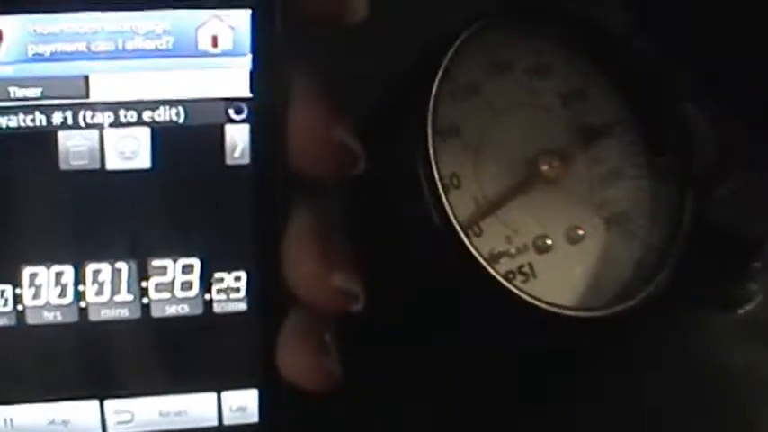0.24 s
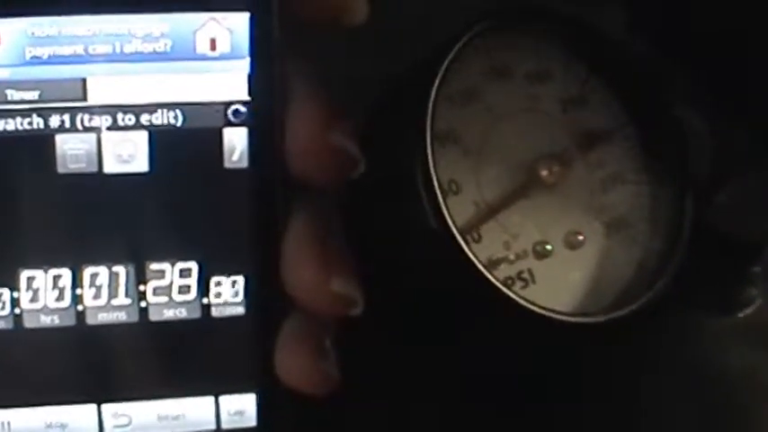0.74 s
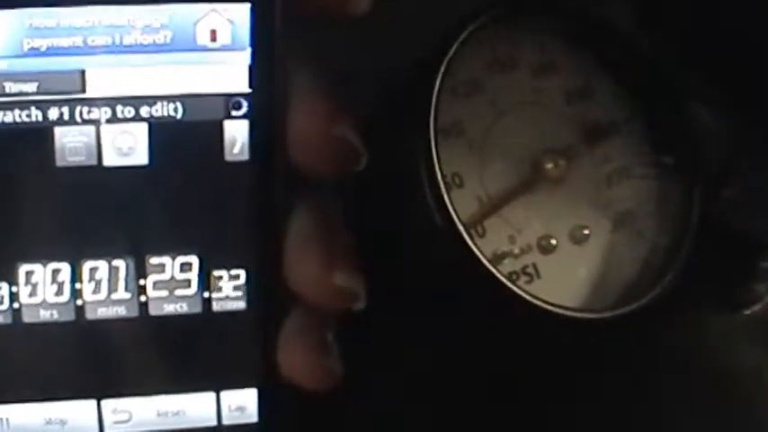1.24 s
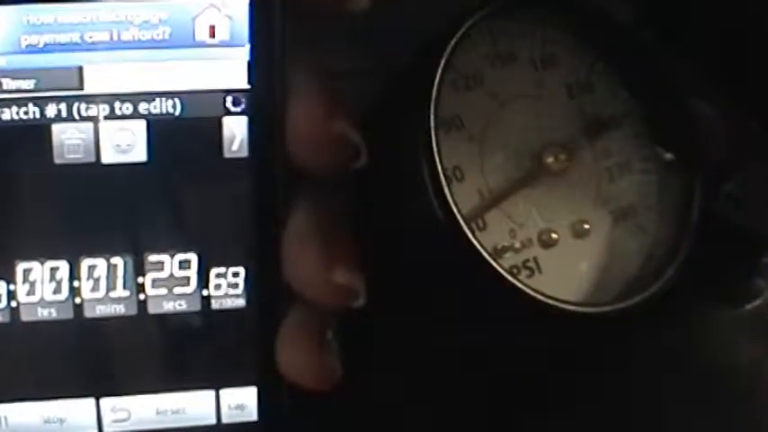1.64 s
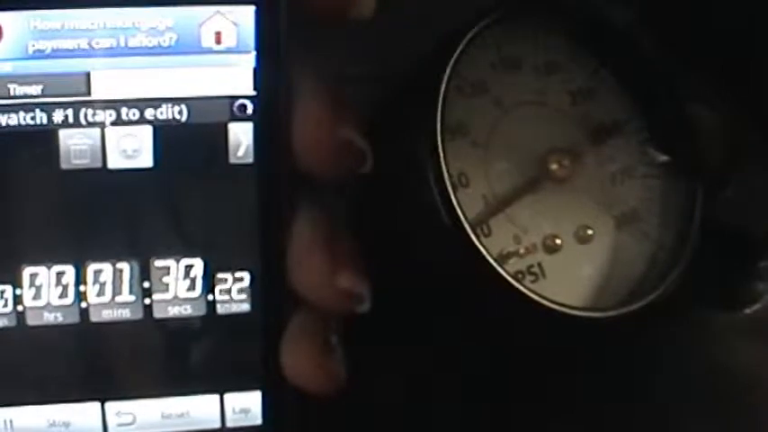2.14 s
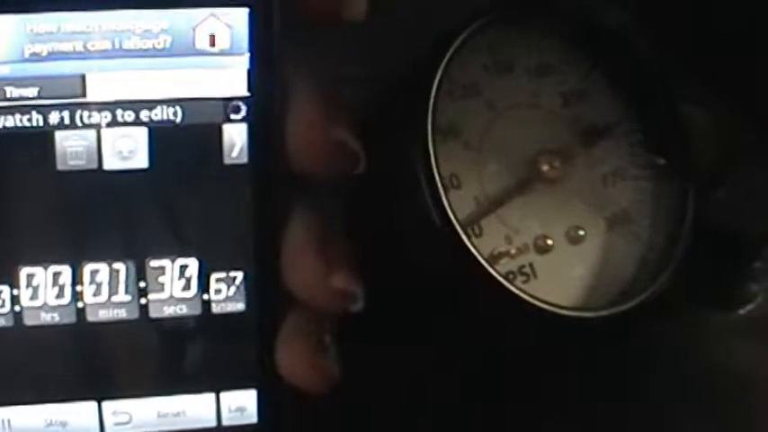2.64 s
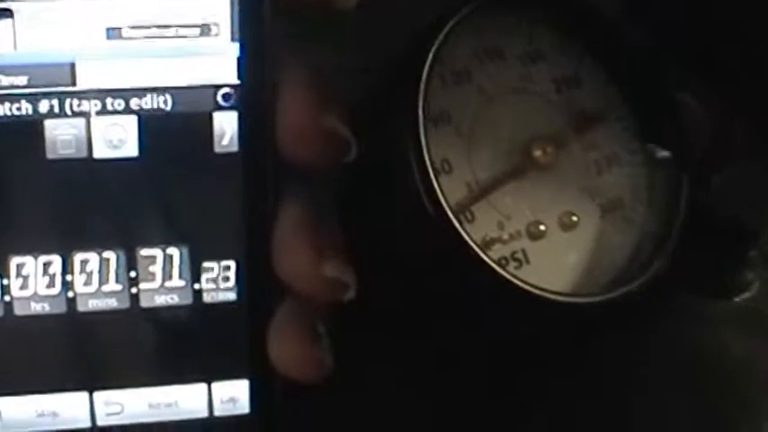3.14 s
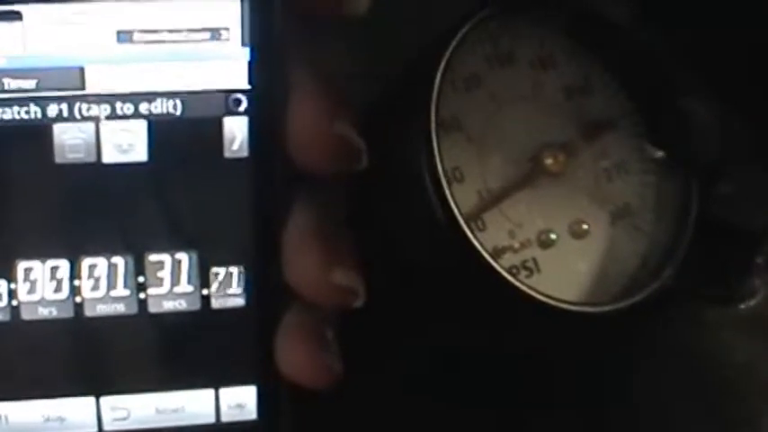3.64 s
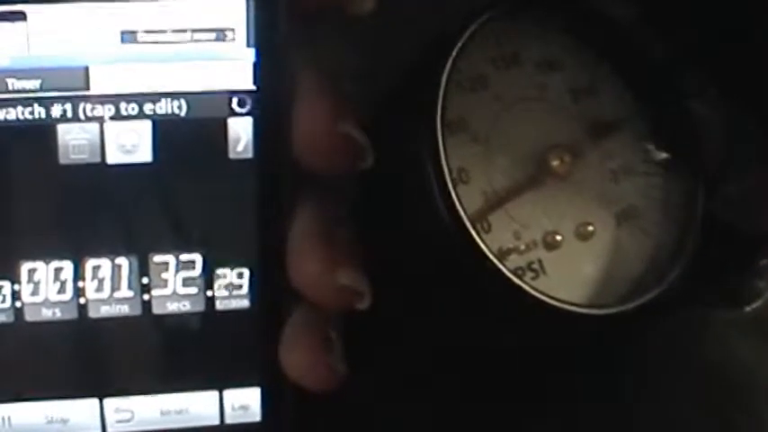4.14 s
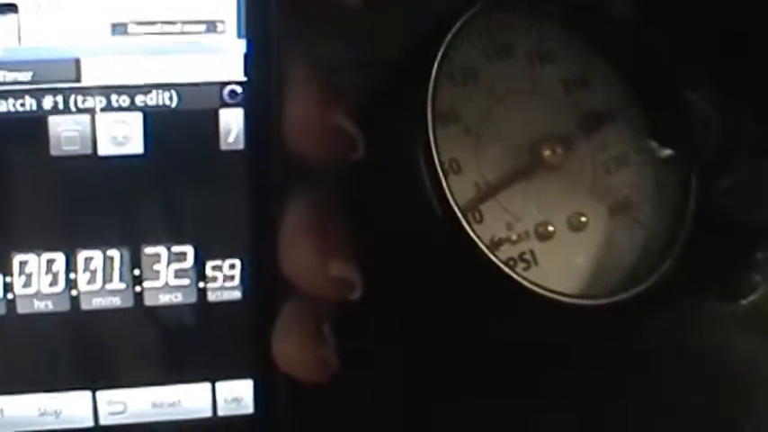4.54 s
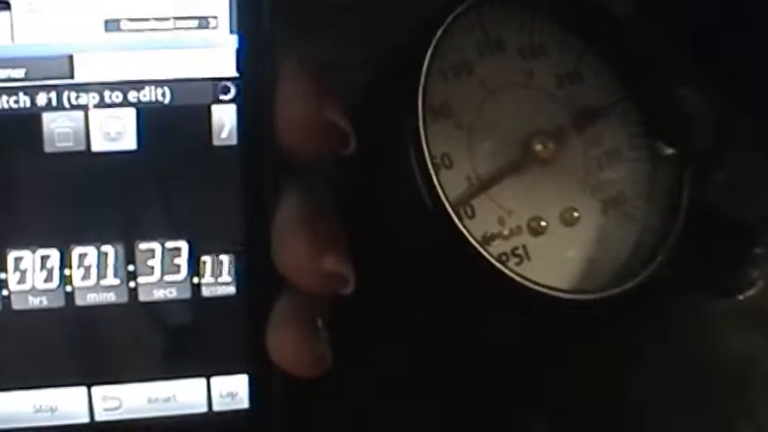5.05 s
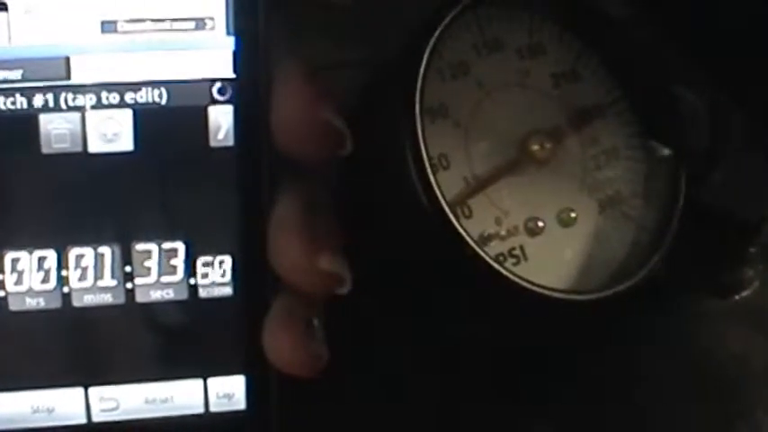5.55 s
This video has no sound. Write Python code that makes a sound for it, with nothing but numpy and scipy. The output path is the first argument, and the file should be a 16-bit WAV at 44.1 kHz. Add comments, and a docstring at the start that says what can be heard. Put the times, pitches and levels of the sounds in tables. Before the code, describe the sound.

A belt-driven piston air compressor pumps quickly and evenly from start to finish. A low hum throbs about thirty-four times a second beneath dense metal knocks, ringing clatter and bright, hissing valve chatter. The hum grows somewhat fuller after about a second and a half. The microphone is close in a small workshop, with loud, slightly rough stereo sound and little deep bass.

```python
"""A steady, fast pumping: a low hum that throbs and thumps, metal knocking, and bright chatter and hiss.
It is a belt-driven twin-piston air compressor in a small workshop, close to the microphone.
The intake is made of tones locked to the crank plus a rung pipe; knocks ring the metal parts;
bouncing reed valves let out bursts of noise; the motor buzzes at twice the mains rate.
Filtered noise stands for fan, belt and room, and blurred echoes make the sound stereo."""
import sys
import numpy as np
from scipy import signal
from scipy.fft import rfft, irfft, next_fast_len
from scipy.io import wavfile
from scipy.ndimage import uniform_filter1d

SR = 44100
rng = np.random.default_rng(int(sys.argv[2]) if len(sys.argv) > 2 else 0)


def put_to_file(sound):
    """Save the sound as 16-bit audio at rate SR, in the file named by the first command-line argument."""
    columns = np.atleast_2d(sound).T  # one column per channel
    safe = np.clip(columns, -1, 1)
    whole_steps = np.round(safe * 32767)
    wavfile.write(sys.argv[1], SR, whole_steps.astype(np.int16))


N = 255780
T = np.arange(N) / SR  # time of each sample, s

START_TURN, DEAD_CENTRE = .006, .005  # crank positions, turns
MAINS_BUZZ_HZ = 119.95
TOP_HZ = 15560  # highest pitch the microphone passes
SETTLES_S, SETTLING_S = 1.66, 0.25  # middle and time constant of the one change in the machine's tone

# Crank speed. Each row: time in seconds, speed in turns per second.
CRANK_SPEED = [(0, 16.9163), (1.5, 16.915), (2.5, 16.913), (3, 16.9145), (3.6, 16.9125), (5.8, 16.9115)]
# Further intake tones. Each row: multiple of the crank rate, level in dB, sign (1 or -1) at dead centre.
INTAKE_TONES = [(20, -17, 1), (19, -26.5, -1), (22, -29.5, 1), (17, -45.5, -1)]
# Knocks in one turn, listed by the part that takes them. Each row: crank angle in turns, strength in dB.
KNOCKS_PER_TURN = { "intake": [(0.0154, -8.8), (0.3919, -2.1), (0.8909, 0.0)], "crankcase": [(.0066, -6),
                   (.3036, -15.5), (.4736, -9), (.5068, -1.5), (.6272, -7.5), (.897, -1.2), (.9469, -4.5)],
                   "head": [(0.2292, -9.5), (0.515, -2), (0.7182, -13.5), (0.9805, 1)],
                   "tank": [(0.4804, -7.5), (0.5882, -0.5), (0.7082, -5), (0.8383, -7.5)],
                   "fins": [(.052, -4), (.105, -8), (.28, -4), (.455, -7), (.498, 1), (.61, -2), (.675, -4),
                   (.80, -11), (.985, 0)], "plate": [(.035, -1), (.13, -7), (.195, -9), (.275, -7),
                   (.475, -2), (.54, -1), (.68, -1), (.93, -3), (.98, -1)], "guard": [(.05, -10), (.13, -7),
                   (.295, -4), (.54, -2), (.66, -15), (.82, -4)], }
# Natural tones of the intake pipe and the metal parts, in relative dB.
# Each row: pitch in Hz, level in dB, time to fade by 60 dB in seconds.
PIPE_MODES = [(73.7, -13.6, 0.25), (130, -1, 0.059), (172, -7.5, 0.13), (254.6, -3.6, 0.34)]
CRANKCASE_MODES = [(401.3, -9, 0.16), (506, -11.5, 0.14), (570.7, -10, 0.097), (647.5, -0.76, 0.098),
                   (661, 3, 0.034), (768, -3, 0.045), (863, -5, 0.084), (950.6, -14, 0.27)]
HEAD_MODES = [(1056.8, 1.5, 0.21), (1105.0, -2, 0.082)]
TANK_MODES = [(1169, -5.5, 0.073), (1231, -7, 0.28), (1279.5, -7, 0.22), (1329, -1, 0.071)]
FIN_MODES = [(1415, -1, 0.02), (1569, 0, 0.036), (1723, 0, 0.036), (1792, 1, 0.031), (1938, -3.5, 0.045),
             (2184, -2, 0.034), (2282, -5, 0.024)]
PLATE_MODES = [(2477, -7, 0.1), (2627, 0, 0.081), (2702, 6.5, 0.027), (2855, -1, 0.055), (3070, -7, 0.037)]
GUARD_MODES = [(3260, 1, 0.025), (3380, 1, 0.048), (3520, -6, 0.076), (3690, -11, 0.038)]
REED_MODES = [(5600, -9, .01), (6275, -3, .03), (6900, -6, .012), (7805, -1, .04), (8105, -5, .04),
              (8430, 0, .04), (8700, -2, .03), (9006, -2, .04), (9140, -2, .03), (9340, -2, .03),
              (9457, 0, .06), (9700, -3, .02), (10118, -1, .03), (10750, -4, .03), (11060, -4, .03),
              (11500, -6, .03), (12400, -5, .01), (12880, -4, .04), (13500, -3, .012), (14800, -5, .02)]
WHINE_MODE = [(2948, 0, .5)]
# Reed openings. Each row: crank angle in turns, strength in dB, gap between bounces in turns,
# loss per bounce in dB, timing spread in seconds.
REED_BOUNCES = [(0.097, -6, .0265, 0.8, 0.000046), (.597, -8.5, 0.034, 0.5, 0.00024)]
# Tone colour of the background air noise. Each row: pitch in Hz, relative level in dB.
AIR_COLOUR = [(18, -74), (30, -19), (114, -11.5), (208, -21), (332, 1), (443, -8), (500, -5), (700, -9),
              (945, -8.5), (1080, -41), (1400, -24.5), (2690, -4.5), (4310, -30), (9430, -40.5),
              (15500, -29)]
# Tone colours of the air at the reeds and of their ring. Each row: pitch in Hz, relative level in dB.
CRACK_COLOUR = [(3500, -73), (5000, -11), (6500, -8), (8000, 1), (9500, 9.5), (11000, -1),
                (13000, -2), (15000, -12)]
HISS_COLOUR = [(3500, -74), (5000, -2.0), (6500, 4.5), (9500, 1.0), (12000, 1.5), (15000, 0.5)]
REED_RING_COLOUR = [(3500, -22), (6000, -5)]
# Difference between the two microphone ports. Each row: pitch in Hz, side level relative to mid in dB.
PORT_DIFFERENCE = [(30, -3), (70, -19.5), (330, -30), (450, -19.5), (640, -2), (830, -10.5), (1080, -23.5),
                   (1500, -8), (2700, -18.5), (4500, 3.5), (6500, -1), (9400, -11), (13000, -4.5)]
# Levels around the one change, listed by voice: level before in dB, level after in dB.
VOICE_LEVELS = {"lower tone": (-23, -17), "thump": (-33, -34), "crankcase": (-27.5, -29),
                "tank": (-29, -29.5), "fins": (-28, -29.5), "plate": (-24.5, -25), "guard": (-38.5, -40),
                "reeds": (-33, -33.5), "air": (-25.5, -26.5)}
# Level of the head's ring. Each row: time in seconds, level in dB.
HEAD_LEVEL = [(0, -19), (.6, -21), (1.4, -21), (2.1, -22), (2.8, -21.5), (3.3, -20), (3.7, -21), (4.2, -20),
              (5.8, -20.5)]


def undb(db):
    """Turn decibels into a plain gain."""
    return 10 ** (np.asarray(db) / 20)


def level(x, db):
    """Scale a sound so that its average (rms) level is db."""
    return x * undb(db) / np.sqrt(np.mean(x ** 2))


def curve(table, column):
    """Join the points of one table column by straight lines, one value per sample."""
    points = np.array(table)
    return np.interp(T, points[:, 0], points[:, column])


def colour(x, table):
    """Change the tone by drawing a loudness curve over pitch."""
    hz, db = np.transpose(table)
    size = next_fast_len(N)
    pitch = np.maximum(np.arange(size // 2 + 1) * SR / size, 1)
    gain = undb(np.interp(np.log(pitch), np.log(hz), db))
    return irfft(rfft(x, size) * gain, size)[:N]


def decay(pulses, fade_s):
    """Give every pulse a tail that dies away smoothly."""
    return signal.lfilter([1], [1, -np.exp(-1 / (fade_s * SR))], pulses)


def ring(x, modes):
    """Let x excite fading tones; neighbouring tones start in opposite directions."""
    out = 0
    for k, (hz, db, t60) in enumerate(modes):
        shrink = np.exp(-np.log(1000) / (t60 * SR))  # per sample
        step = 2 * np.pi * hz / SR  # radians per sample
        tone = signal.lfilter([0, np.sin(step)], [1, -2 * shrink * np.cos(step), shrink * shrink], x)
        out = out + (-1) ** (k + 1) * undb(db) * tone
    return out


def every_turn(turn, angles, db, slip_s, scatter_db):
    """Place a pulse at each crank angle of each turn, slightly off in time and size."""
    at = (np.arange(-1, int(turn[-1]) + 1)[:, None] + np.asarray(angles)).ravel()
    chance = rng.standard_normal((len(at), 2))
    on_time = np.interp(at, turn, np.arange(N), -N, 2 * N)
    i = (on_time + slip_s * SR * chance[:, 0]).astype(int)
    size = undb(np.resize(db, len(at)) + scatter_db * chance[:, 1])
    inside = (i >= 0) & (i < N)
    return np.bincount(i[inside], size[inside], N)


def knocks(turn, part, slip_s, scatter_db):
    """Collect the blows that one part takes, turn after turn."""
    angles, db = np.transpose(KNOCKS_PER_TURN[part])
    return every_turn(turn, angles, db, slip_s, scatter_db)


def voice(name):
    """Gain of a voice, gliding from its level before the change to its level after."""
    before_db, after_db = VOICE_LEVELS[name]
    progress = (1 + np.tanh((T - SETTLES_S) / SETTLING_S)) / 2
    return undb(before_db + (after_db - before_db) * progress)


def air():
    """Steady coloured noise for the fan, the belt and the workshop's wash of echoes."""
    return voice("air") * level(colour(rng.standard_normal(N), AIR_COLOUR), 0)


def motor():
    """Magnetic pull buzzes at twice the mains rate; noise through a narrow ring gives a wavering whine."""
    phase = 2 * np.pi * MAINS_BUZZ_HZ * T
    buzz = undb(-33.0) * np.cos(phase)
    fourth_harmonic = undb(-39) * np.cos(4 * phase)
    whine = level(ring(rng.standard_normal(N), WHINE_MODE), -33.5)
    return buzz + fourth_harmonic + whine


def reeds(turn):
    """Each reed lifts softly, then bounces on its seat, spitting air through the head."""
    bounce = np.arange(13)
    taps = 0
    for angle, db, gap, loss_db, slip_s in REED_BOUNCES:
        bounce_db = db - loss_db * bounce - 3.6 * (bounce == 0)  # the first lift is softer
        taps = taps + every_turn(turn, angle + gap * bounce, bounce_db, slip_s, scatter_db=1.5)
    spit = decay(taps, fade_s=0.00014)
    noise = rng.standard_normal((3, N))
    crack = colour(level(spit * noise[0], 0), CRACK_COLOUR)
    # the leak past the rings follows the bounces only loosely
    leak = level((uniform_filter1d(spit, size=120) + 0.087) * noise[1], 0)
    hiss = colour(leak, HISS_COLOUR)
    ringing = colour(ring((level(spit, 0) + 0.63) * noise[2], REED_MODES), REED_RING_COLOUR)
    return voice("reeds") * (level(crack, -5.5) + level(hiss, 0.63) + level(ringing, -2.04))


def struck(pulses, modes, rattle_db, rattle_s, rub_db, touching):
    """Clean blows ring a part; rattle and rubbing ring it too, but contact shortens that ring to a share."""
    noise = rng.standard_normal((2, N))
    rattle = level(decay(pulses, rattle_s) * noise[0], 0)
    rubbing = undb(rub_db) * noise[1]
    damped = np.array(modes) * [1, 1, touching]
    rough = ring(rattle + rubbing, damped)
    clean = level(ring(pulses, modes), 0)
    return level(clean + level(rough, rattle_db), 0)


def metalwork(turn):
    """Valves and bearings knock the metal; each part rings with its own tones to its own knocks."""
    def part(name, modes, scatter_db, **roughness):
        return struck(knocks(turn, name, slip_s=.00003, scatter_db=scatter_db), modes, **roughness)
    case = part("crankcase", CRANKCASE_MODES, scatter_db=1.8,
                rattle_db=-18.0, rattle_s=0.015, rub_db=-10, touching=0.83)
    head = part("head", HEAD_MODES, scatter_db=0.2,
                rattle_db=-6.5, rattle_s=0.011, rub_db=-6, touching=0.57)
    tank = part("tank", TANK_MODES, scatter_db=0.5,
                rattle_db=-4.0, rattle_s=0.0036, rub_db=3, touching=0.81)
    fins = part("fins", FIN_MODES, scatter_db=1.0,
                rattle_db=-0.8, rattle_s=0.0028, rub_db=1.5, touching=0.87)
    plate = part("plate", PLATE_MODES, scatter_db=1.0,
                 rattle_db=5.5, rattle_s=0.002, rub_db=-10, touching=0.89)
    guard = part("guard", GUARD_MODES, scatter_db=1.5,
                 rattle_db=1, rattle_s=0.0039, rub_db=10.0, touching=0.51)
    # minus: the head's face swings away from the microphone first
    return (voice("crankcase") * case - undb(curve(HEAD_LEVEL, column=1)) * head + voice("tank") * tank
            + voice("fins") * fins + voice("plate") * plate + voice("guard") * guard)


def intake(turn):
    """Tones at 18 and 20 times the crank rate throb twice a turn; suction strokes thump in the pipe."""
    angle = 2 * np.pi * (turn - DEAD_CENTRE)
    tones = -voice("lower tone") * np.cos(18 * angle)
    for multiple, db, sign in INTAKE_TONES:
        tones = tones + sign * undb(db) * np.cos(multiple * angle)
    strokes = knocks(turn, "intake", slip_s=.00005, scatter_db=.4)
    return tones + voice("thump") * level(ring(strokes, PIPE_MODES), 0)


def scene():
    """The machine sounds from the front; restless echoes of nearby surfaces tell the two ports apart."""
    turn = START_TURN + np.cumsum(curve(CRANK_SPEED, column=1)) / SR
    mid = air() + motor() + reeds(turn) + metalwork(turn) + intake(turn)
    hz, _, frames = signal.stft(mid, SR, nperseg=1024)
    # the phase of each pitch band wanders at random, so the echo stays unlike the direct sound
    steps = 0.802 * rng.standard_normal(frames.shape)  # radians per frame
    drift = np.cumsum(steps, axis=1) + 2 * np.pi * rng.random((len(hz), 1))
    echo = signal.istft(frames * np.exp(1j * drift), SR, nperseg=1024)[1][:N]
    side = colour(echo, PORT_DIFFERENCE)
    return np.array([mid + side, mid - side])


def record(dry):
    """The microphone drops the deep bass, rounds the loudest peaks and cuts the top."""
    no_bass = signal.sosfilt(signal.butter(3, 60, "high", fs=SR, output="sos"), dry)
    rounded = np.tanh(.8 * no_bass) / .8
    return signal.sosfilt(signal.ellip(12, .2, 80, TOP_HZ, fs=SR, output="sos"), rounded)


dry = scene()
out = record(dry)
put_to_file(out)
```